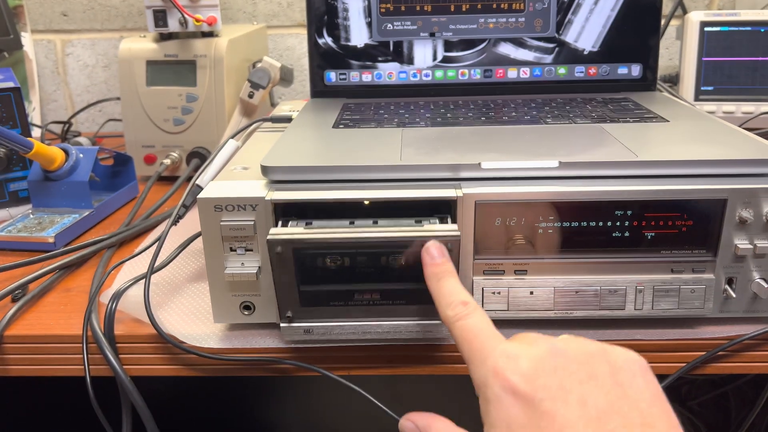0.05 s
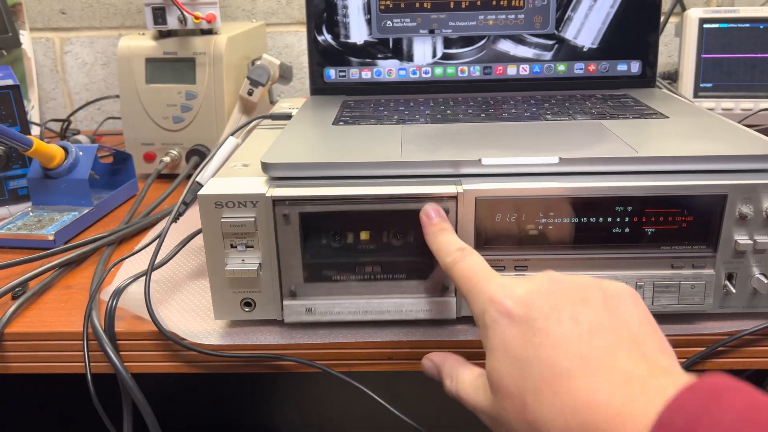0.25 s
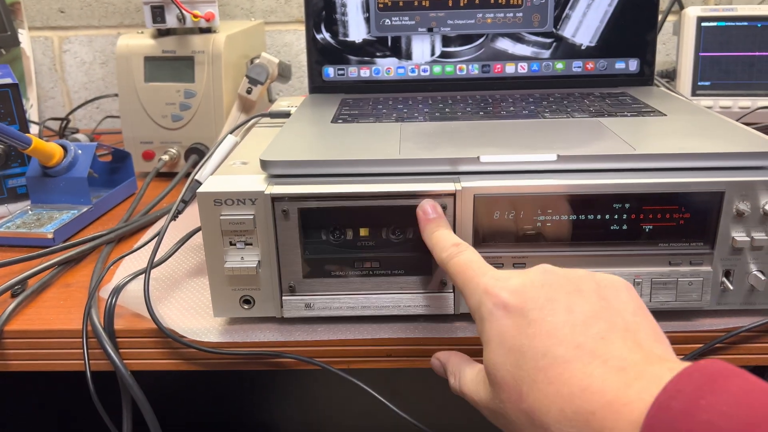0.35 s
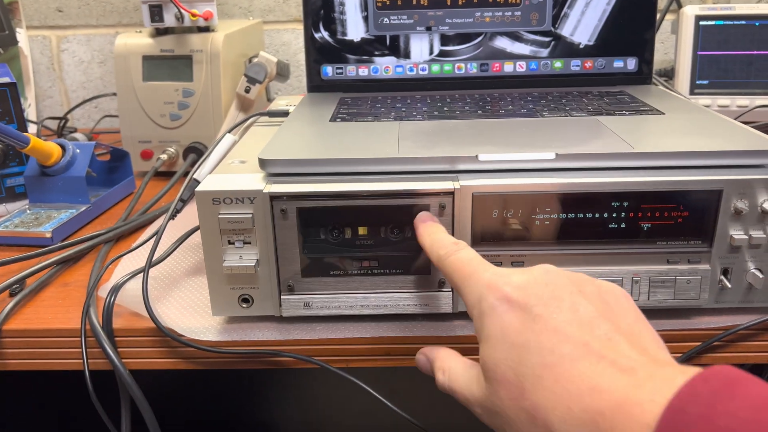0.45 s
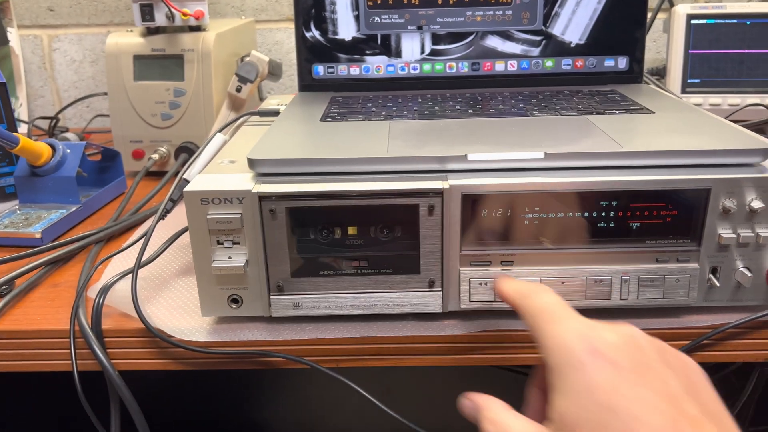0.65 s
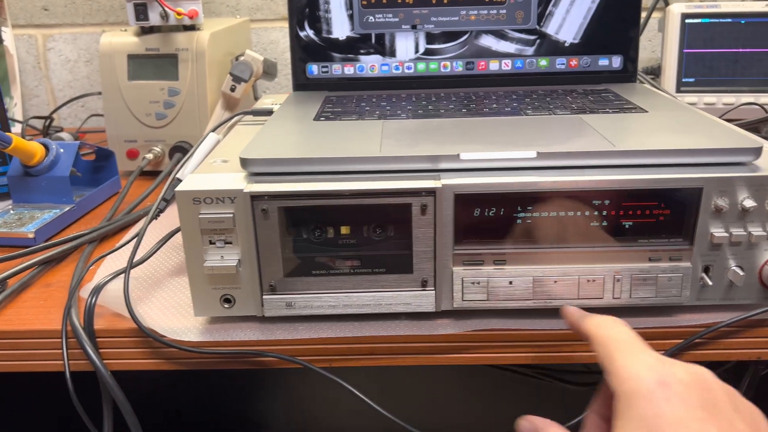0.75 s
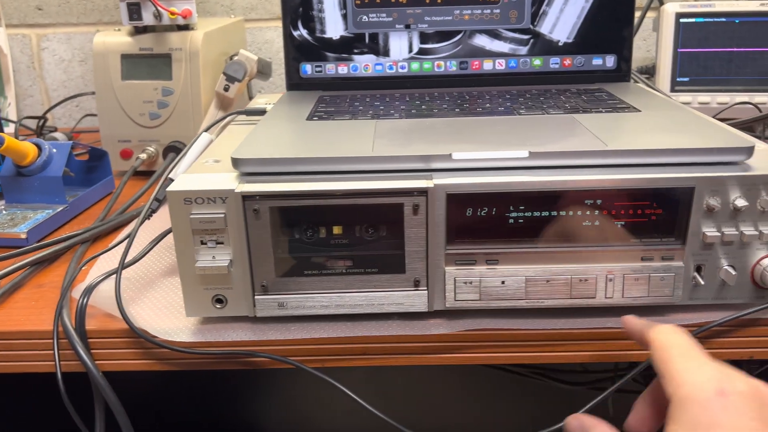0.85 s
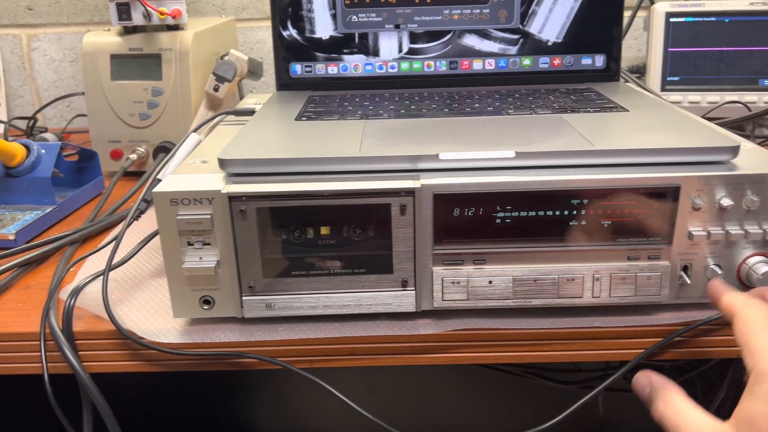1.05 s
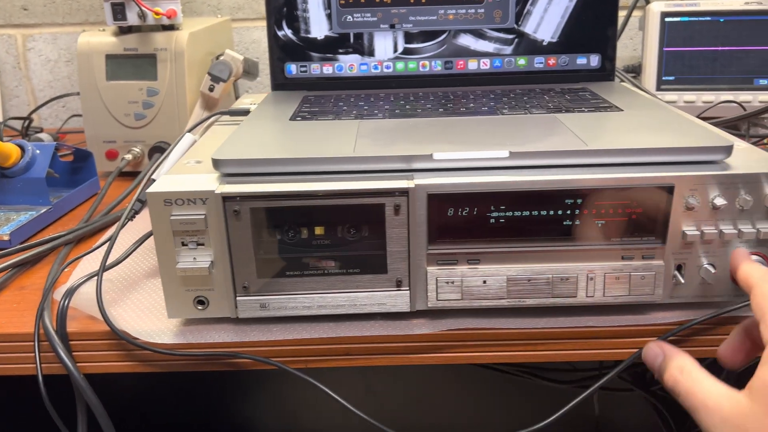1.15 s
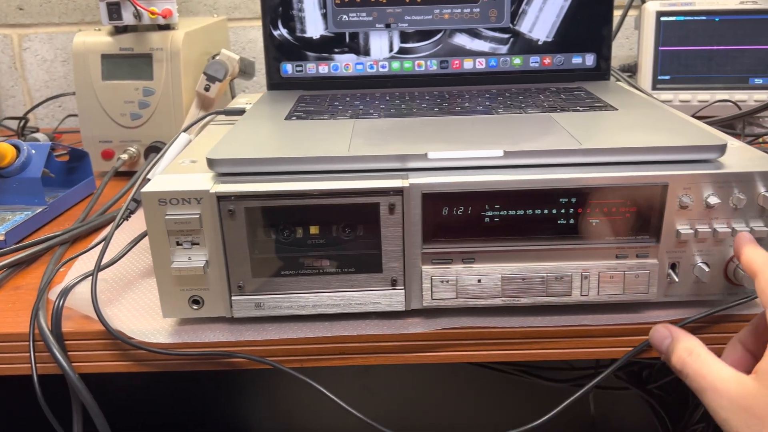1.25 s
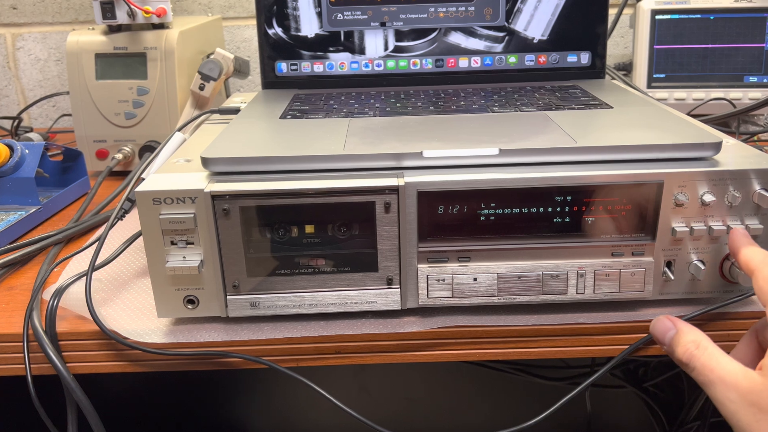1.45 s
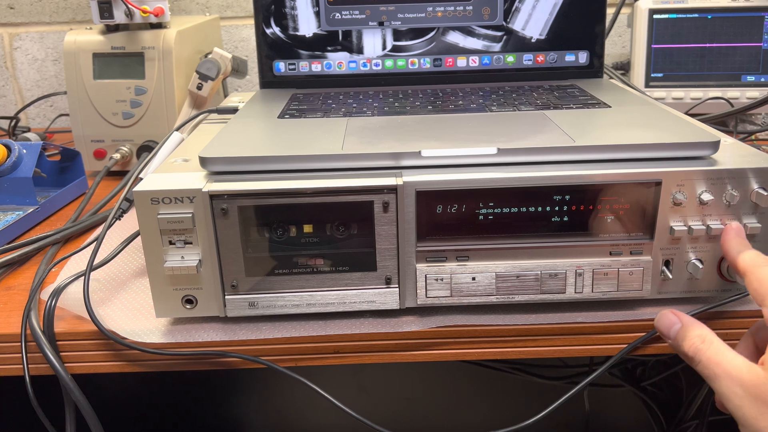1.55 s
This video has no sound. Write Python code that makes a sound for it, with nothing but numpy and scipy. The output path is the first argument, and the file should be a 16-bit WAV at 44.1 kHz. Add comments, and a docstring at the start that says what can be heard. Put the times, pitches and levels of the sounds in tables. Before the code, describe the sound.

Close up on a workbench, a plastic cassette door rubs softly, clacks and latches firmly with a brief low cabinet thump, then only quiet room hum until a crisp switch click near the end, heard in stereo.

```python
"""Cassette door and switch

A finger pushes a cassette deck's plastic door shut on a workbench: friction noise and squeak, faint ticks,
a rattling catch, then the latch snapping home. Contacts are noise cracks plus damped modal rings.
Blows excite low cabinet modes and filtered noise shudders the bench. Later a switch clicks.
Decaying noise and close echoes form the room; shaped noise gives its steady hum.
"""
import sys
import numpy as np
from scipy import signal
from scipy.fft import rfft, irfft, next_fast_len
from scipy.io import wavfile
from scipy.ndimage import uniform_filter1d

SR = 44100
rng = np.random.default_rng(int(sys.argv[2]) if len(sys.argv) > 2 else 0)


def to_wav(sig):
    """Store sig (one row per channel, or 1-D mono) as 16-bit WAV at the path in sys.argv[1].

    Samples outside -1..1 are clipped; the rate is SR.
    """
    pcm = np.clip(np.atleast_2d(sig), -1, 1) * 32767
    pcm = np.round(pcm).astype(np.int16)
    wavfile.write(sys.argv[1], SR, pcm.T)  # frames by channels


N = 70560


def amp(db):
    """Decibels to amplitude ratio."""
    return 10 ** (np.asarray(db) / 20)


def evened(x):
    """Scale to unit RMS over all channels."""
    return x / np.sqrt(np.mean(x ** 2) + 1e-20)


def read(points, hz):
    """Interpolate a (frequency, value) table over log frequency."""
    f, value = np.transpose(points)
    return np.interp(np.log(hz + 1), np.log(f + 1), value)


def add(mix, start_s, sound):
    """Add a sound in place, cut at the end of the mix."""
    part = mix[..., round(start_s * SR):][..., :sound.shape[-1]]
    part += sound[..., :part.shape[-1]]


def blend(a, b, same):
    """Pair of signals that share the fraction `same` at constant power."""
    return np.array([a, same * a + np.sqrt(1 - same ** 2) * b])


# likeness of the two microphones in diffuse sound: (frequency [Hz], likeness [0-1])
ALIKE = [(60, .95), (300, 0.1), (700, 0.04), (1400, .05), (6000, 0.9)]


def diffuse(pair):
    """Give two unrelated signals a frequency-dependent likeness."""
    a, b = rfft(pair)
    hz = np.fft.rfftfreq(pair.shape[1], 1 / SR)
    same = np.clip(read(ALIKE, hz), 0, 1)
    return irfft(blend(a, b, same), pair.shape[1])


def coloured(gain):
    """Steady diffuse noise with a given gain per frequency."""
    noise = diffuse(rng.standard_normal((2, N)))
    return evened(irfft(rfft(noise) * gain, N))


# room tone spectrum: (frequency [Hz], level [dB])
HUM = [(25, -38), (38, -5), (52, 7.5), (90, -9), (160, -10), (265, -12), (450, -15), (620, -24.5),
       (1000, -21.5), (1650, -27), (2300, -30), (3000, -36), (5000, -36.5), (8000, -38.5), (11000, -35.5),
       (13500, -32), (16000, -44.5)]
# bands that stand out of the room tone: (frequency [Hz], width [Hz], boost [dB])
WHINE = [(258, 22, 8.5), (324, 35, 4), (744, 100, 5), (1290, 57, 9), (1996, 220, 7), (3200, 160, 4)]
# treble level of the room tone, in full from 12 kHz up: (time [s], level [dB])
HISS = [(0, 6), (.2, 1.5), (.6, 2), (1.0, -6.5), (1.25, -6), (1.4, -9), (1.6, 2.5)]
HUM_DB, PATCHY_DB, HUM_LAG_S = -67, 1.6, .00027


def hum():
    """Room tone: low fan rumble with a few whining bands and gently drifting patches."""
    noise = diffuse(rng.standard_normal((2, N)))
    hz, t, z = signal.stft(noise, SR, nperseg=2048, noverlap=1536)
    patches = uniform_filter1d(rng.standard_normal(z.shape[1:]), 20, 0)
    patches = evened(uniform_filter1d(patches, 5, 1))
    treble = np.clip(hz / 12000, 0, 1)[:, None] * np.interp(t, *np.transpose(HISS))
    bands = sum(db * np.exp(-((hz - f) / width) ** 2) for f, width, db in WHINE)
    z = z * amp((read(HUM, hz) + bands)[:, None] + PATCHY_DB * patches + treble)
    z[0] *= np.exp(-2j * np.pi * hz * HUM_LAG_S)[:, None]  # left lags
    tone = signal.istft(z, SR, nperseg=2048, noverlap=1536)[1][:, :N]
    return amp(HUM_DB) * evened(tone)


# door sliding on its damper: (time [s], rub level [dB], squeak level [dB])
SLIDE = [(0, -65, -55.5), (0.038, -112, -96), (0.048, -77, -60.5), (.072, -65.5, -74.5),
         (.085, -70.5, -67.5), (.115, -61.5, -94), (.138, -59.5, -69), (.16, -66, -77.5),
         (0.201, -75, -75.5), (0.227, -57, -66.5), (.26, -75, -75), (.3, -100, -100)]
# resonances of the rub: (frequency [Hz], width [Hz], relative level [dB])
SLIDE_RING = [(295, 60, 5), (735, 220, -5), (179.5, 160, -5.5)]
SQUEAK_HZ, SQUEAK_WAVER_HZ = 1325, 7.7  # waver is RMS


def slide():
    """Soft friction noise in the door's resonances, with a thin wavering squeak."""
    hz, t = np.fft.rfftfreq(N, 1 / SR), np.arange(N) / SR
    s, rub_db, squeak_db = np.transpose(SLIDE)
    resonances = sum(amp(db) / (1 + (2 * (hz - f) / width) ** 2) for f, width, db in SLIDE_RING)
    rub = coloured(resonances)
    waver = evened(uniform_filter1d(rng.standard_normal(N), size=800))
    phase = 2 * np.pi * np.cumsum(SQUEAK_HZ + SQUEAK_WAVER_HZ * waver) / SR
    squeak = evened(np.sin(phase))
    return rub * amp(np.interp(t, s, rub_db)) + squeak * amp(np.interp(t, s, squeak_db))


# bench shudder under the push and the latch: (time [s], level [dB])
SHUDDER = [(0, -63), (0.072, -61), (.1, -86), (0.216, -62.5), (0.236, -33), (.28, -43), (.32, -35.5),
           (.4, -50), (0.459, -52), (0.561, -60), (0.599, -66), (.65, -67), (.72, -77)]
# shudder spectrum: (frequency [Hz], level [dB])
SHUDDER_COLOUR = [(38, -35), (60, -5.5), (80, 0), (110, -14), (160, -9.5), (270, -6), (330, -12),
                  (480, -15), (800, -29), (1140, -18), (1500, -29.5), (3000, -56)]


def bench():
    """Low, broken shudder of the loaded bench: filtered noise under a level curve."""
    hz = np.fft.rfftfreq(N, 1 / SR)
    shake = coloured(amp(read(SHUDDER_COLOUR, hz))).mean(axis=0)
    return shake * amp(np.interp(np.arange(N) / SR, *np.transpose(SHUDDER)))


# spectrum of cracking plastic: (frequency [Hz], level [dB])
CRACK = [(300, -29), (900, -11.5), (2000, 0.5), (3000, -7), (5000, -7.5), (6300, -7), (7200, -8),
         (8500, -9.5), (11000, -10), (13500, -7), (15100, -12), (15700, -25.5), (16500, -29.5)]
CRACK_RISE_S, CRACK_ALIKE = .0007, .2
TOP_HZ = 7990  # half the top-end dB is reached here


def crack(db, top_db, t60_s):
    """Decaying burst of bright noise, mostly different at each microphone."""
    (a, b), t = rng.standard_normal((2, 4096)), np.arange(4096) / SR
    hz = np.fft.rfftfreq(4096, 1 / SR)
    spectrum = rfft(blend(a, b, CRACK_ALIKE)) * amp(read(CRACK, hz))
    plain = rfft(evened(irfft(spectrum)))
    top_end = amp(top_db / (1 + (TOP_HZ / (hz + 1)) ** 4))
    envelope = amp(db - 60 * t / t60_s) * np.minimum(t / CRACK_RISE_S, 1)
    return irfft(plain * top_end) * envelope


STRIKE_S, SNAP_S = 0.0014, 0.00054  # soft starts: door, switch
RING_SPREAD = 0.57  # RMS right-channel phase [rad per kHz]


def ring(modes, start_s=STRIKE_S):
    """Dying sines with a soft start, panned by level and out of step at the right."""
    t = np.arange(SR // 8) / SR
    out = np.zeros((2, len(t)))
    for hz, db, t60_s, pan_db in modes:
        level = amp(db - 60 * t / t60_s + np.array([[pan_db], [-pan_db]]) / 2)
        right_phase = RING_SPREAD * hz / 1000 * rng.standard_normal()
        out += level * np.sin(2 * np.pi * hz * t + [[0], [right_phase]])
    return np.minimum(t / start_s, 1) * out


# door and latch contacts: (time [s], deep ring [dB], high ring [dB], ring free for [s],
# crack [dB], crack top end [dB], crack t60 [s])
CONTACTS = [(.002, -62.5, -70, 0.015, -43.5, 20, 0.026), (0.017, -50.5, -58.5, 0.011, -58.5, 3.5, 0.12),
            (0.0382, -61, -61, 0.0099, -52, 10.5, 0.047), (.071, -68, -69, 0.0084, -60, 1, 0.036),
            (0.094, -76, -71.5, 0.026, -66, -1.5, 0.033), (.113, -73, -68.5, 0.011, -67.5, -1, 0.081),
            (.131, -62, -67, 0.045, -63, -2, 0.057), (.171, -78, -73, 0.0055, -58, -13, 0.13),
            (0.219, -45.5, -41, 0.0074, -42.5, 0, .05), (0.2254, -27, -24, 0.0091, -35, 1.5, .05),
            (0.233, -42.5, -34, 0.0043, -38, -1, 0.11), (0.2386, -40.5, -26.5, 0.0082, -48, 1.5, .1),
            (0.259, -43, -47.5, 0.058, -57, -7, 0.023), (0.2636, -26.5, -33, 0.017, -52, -6, 0.045),
            (.267, -31, -28, 0.0044, -35.5, 3, .03), (0.2789, -23, -30.5, .006, -36.5, -6.5, 0.14),
            (.283, -27.5, -32.5, 0.012, -39.5, -7, .04), (0.2854, -44, -37, 0.0022, -33, 1.5, .1),
            (0.2898, -53, -42, 0.021, -25, 11, 0.039), (0.2904, -23, -31, 0.011, -25.5, -3, 0.036),
            (0.2933, -19.5, -22, 0.0089, -24, -14.5, 0.083), (.303, -37, -31.5, .012, -39, -3.5, .08),
            (0.31, -26, -36.5, 0.0085, -44, -6, 0.066), (0.364, -55, -84, 0.051, -51, -4.5, 0.028),
            (.440, -59.5, -59, 0.011, -60.5, -5, 0.25)]
# rings of the door panel and of the catch: (frequency [Hz], level [dB], t60 [s], left-right [dB])
DEEP_RING = [(958, -16.5, 0.15, -5), (1046.5, 1, 0.1, 2.5), (1113, -13.5, .12, -1), (702, -17, 0.053, 12.5)]
HIGH_RING = [(1300, -9.5, 0.53, 1), (1379, 2, 0.13, 1), (1446, -11, 0.088, 0.082),
             (1750, -10.5, 0.15, 0.0068), (2120, -18, 0.032, 0.019), (2445, -23.5, 0.12, 0.066)]
DAMPED_T60_S = 0.0073


def door():
    """Each contact cracks and rings the panel and the catch until the pressing finger damps them."""
    out, deep, high = np.zeros((2, N)), ring(DEEP_RING), ring(HIGH_RING)
    t = np.arange(deep.shape[1]) / SR
    for s, deep_db, high_db, free_s, crack_db, top_db, t60_s in CONTACTS:
        add(out, s, crack(crack_db, top_db, t60_s))
        damping = amp(-60 * np.maximum(t - free_s, 0) / DAMPED_T60_S)
        add(out, s, (amp(deep_db) * deep + amp(high_db) * high) * damping)
    return out


# blows that shake the cabinet: (time [s], knock level [dB], boom level [dB])
BLOWS = [(0.032, -75.5, -68), (0.228, -38, -47.5), (0.292, -25.5, -55.5), (0.315, -48, -32.5),
         (0.359, -42.5, -57.5), (0.444, -48.5, -55.5), (1.531, -44, -66), (1.565, -62, -63.5)]
# cabinet modes: (frequency [Hz], level [dB], t60 [s], rise time constant [s])
KNOCK = [(222, -12.5, 0.038, .003), (280.4, 0.5, 0.031, 0.0037), (400.2, -4.5, 0.05, 0.0073),
         (547, -10, 0.038, 0.0013)]
BOOM = [(106.9, 6, .3, 0.0028), (1136.3, -22.5, 0.24, 0.032), (1020, -25.5, 0.22, .07)]
KNOCK_HOLD_S, BOOM_HOLD_S = 0.013, 0.058  # delay before decay


def swell(modes, hold_s):
    """Sum of sines that rise exponentially and decay after a hold."""
    t = np.arange(SR // 2) / SR
    out = np.zeros(len(t))
    for hz, db, t60_s, rise_s in modes:
        decay = amp(db - 60 * np.maximum(t - hold_s, 0) / t60_s)
        out += (1 - np.exp(-t / rise_s)) * decay * np.sin(2 * np.pi * hz * t)
    return out


def cabinet():
    """Cabinet modes that swell after each blow and die away."""
    out = np.zeros(N)
    knock, boom = swell(KNOCK, KNOCK_HOLD_S), swell(BOOM, BOOM_HOLD_S)
    for s, knock_db, boom_db in BLOWS:
        add(out, s, amp(knock_db) * knock + amp(boom_db) * boom)
    return out


# room decay: (frequency [Hz], t60 [s])
ROOM = [(100, 0.32), (300, 0.34), (1000, 0.33), (3000, 0.45), (8000, 0.26), (12000, 0.14), (16000, 0.2)]
ROOM_DB, ECHO_DB, TAIL_RISE_S = -18, -14, 0.0027


def room(x):
    """Close echoes off bench and gear, plus a tail whose bands die at their own speed."""
    noise = diffuse(rng.standard_normal((2, SR // 2)))
    hz, t, z = signal.stft(noise, SR, nperseg=256)
    decay = amp(-60 * t / read(ROOM, hz)[:, None])
    tail = signal.istft(z * decay, SR, nperseg=256)[1]
    rise = np.minimum(np.arange(tail.shape[1]) / SR / TAIL_RISE_S, 1)
    tail = amp(ROOM_DB) * tail * rise / np.linalg.norm(tail[0])
    echoes = np.zeros_like(tail)
    delays = rng.integers(40, 600, (2, 6))  # samples
    np.put_along_axis(echoes, delays, rng.choice([-1., 1.], (2, 6)), 1)
    response = tail + amp(ECHO_DB) * echoes / np.sqrt(6)
    return signal.fftconvolve(x, response, axes=1)[:, :N]


# switch clicks: (time [s], ring [dB], crack [dB], crack top end [dB], crack t60 [s])
SWITCH = [(1.064, -99, -81.5, 20, 0.024), (1.515, -76, -63, -2.5, .08), (1.5191, -55.5, -58.5, -9.5, 0.028),
          (1.5259, -33, -26.5, -5, 0.018), (1.5285, -38, -44, -19.5, 0.12), (1.532, -38, -37, -32.5, 0.058),
          (1.539, -43.5, -53, -4.5, 0.068), (1.555, -56.5, -59, -4, 0.083), (1.569, -56, -70, -9, 0.13)]
# switch and front panel modes: (frequency [Hz], level [dB], t60 [s], left-right [dB])
SWITCH_RING = [(300, -17, 0.17, 3.5), (419.8, -11, 0.053, 3), (546, -11.5, 0.098, -0.5),
               (726, -17, 0.04, -1), (1065, -3, 0.046, 4.5), (1312, -4, 0.029, -16),
               (1540, -1.5, 0.043, 9.5), (1714, -4.5, 0.04, -4), (1894, -8.5, 0.027, -6),
               (2253, -5, 0.035, -3), (2508, -12, 0.12, 1), (2985, -6.5, 0.056, -8),
               (3477, -3.5, 0.015, 13.5), (3760, -5, 0.031, -7), (4280, -10.5, 0.05, 11)]
BOUNCE_DETUNE = .015  # RMS frequency ratio


def switch():
    """Small snap with bounces; each rings the front panel at slightly different frequencies."""
    out = np.zeros((2, N))
    for s, ring_db, crack_db, top_db, t60_s in SWITCH:
        add(out, s, crack(crack_db, top_db, t60_s))
        modes = [(hz * (1 + BOUNCE_DETUNE * rng.standard_normal()), *rest) for hz, *rest in SWITCH_RING]
        add(out, s, amp(ring_db) * ring(modes, SNAP_S))
    return out


CABINET_SEND_DB = -12  # cabinet level into the room


def scene():
    """Mix deck, cabinet and their room sound with bench, slide and hum."""
    deck, box = door() + switch(), cabinet()
    wet = room(deck + amp(CABINET_SEND_DB) * box)
    return deck + box + wet + bench() + slide() + hum()


# microphone balance: (frequency [Hz], left-right [dB])
TILT = [(60, -2.5), (450, -5), (700, 3.5), (1200, 1), (2500, 4.5), (4200, 2.5), (6400, 12)]
BASS_CUT_HZ, EDGE_HZ = 19, 16600
SHARED_HZ, LEFT_LAG_S = 6700, .000148


def record(dry):
    """Cut deep bass, balance the channels, feed right treble late to the left, then band-limit."""
    size = next_fast_len(N + 4096)
    hz = np.fft.rfftfreq(size, 1 / SR)
    left, right = rfft(dry, size) / (1 + BASS_CUT_HZ / (1j * hz + 1e-9)) ** 2
    shared = np.clip((hz - SHARED_HZ) / 400 + .5, 0, 1)  # 400 Hz wide crossfade
    tilt = amp(read(TILT, hz) * (1 - shared) / 2)
    late = right * np.exp(-2j * np.pi * hz * LEFT_LAG_S)
    left = np.cos(shared * np.pi / 2) * left + np.sin(shared * np.pi / 2) * late
    out = irfft(np.array([tilt * left, right / tilt]), size)[:, :N]
    lowpass = signal.firwin(511, EDGE_HZ, window=("kaiser", 9), fs=SR)
    return signal.oaconvolve(out, lowpass[None], "same")


dry = scene()
out = record(dry)
to_wav(out)
```